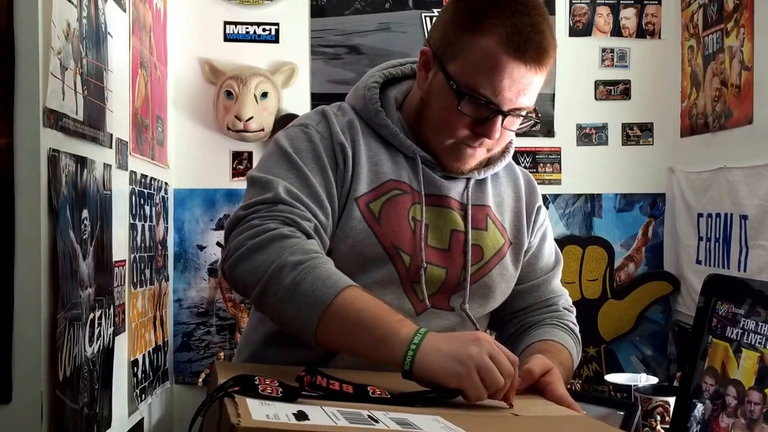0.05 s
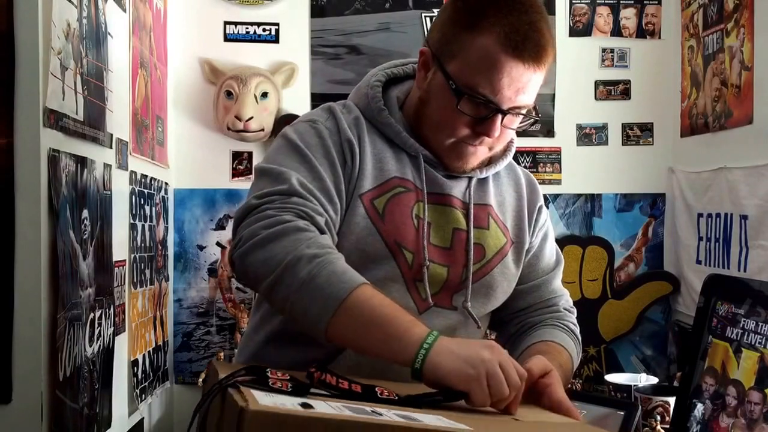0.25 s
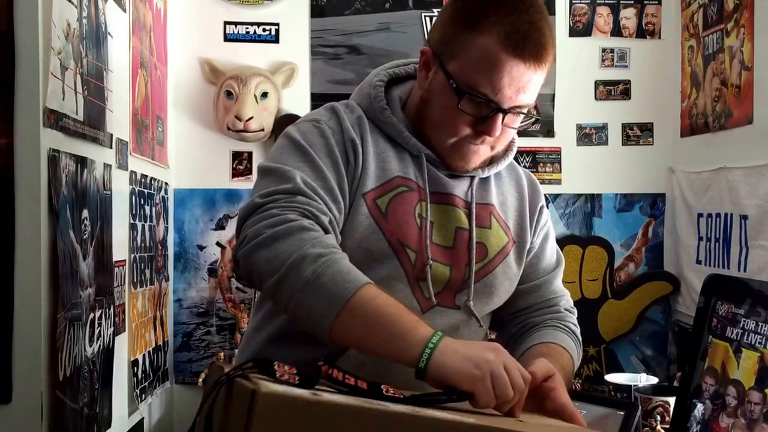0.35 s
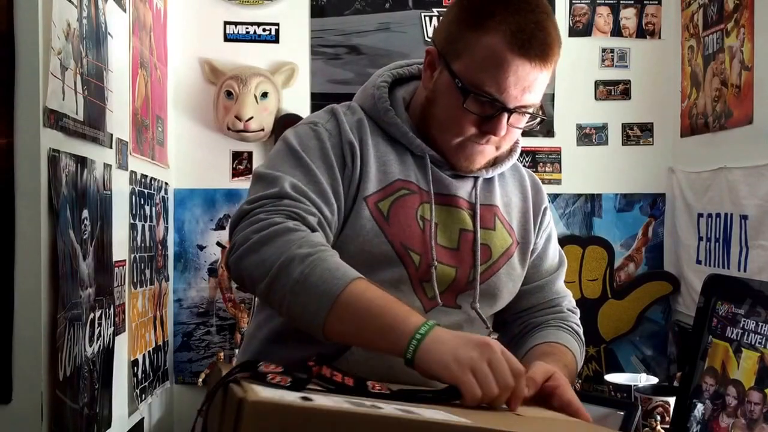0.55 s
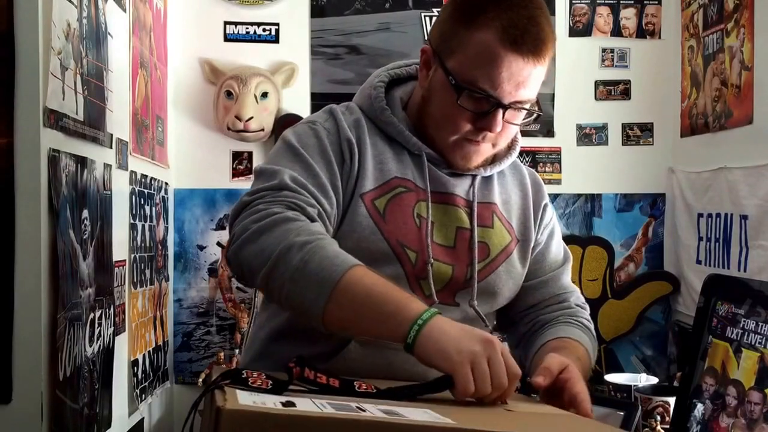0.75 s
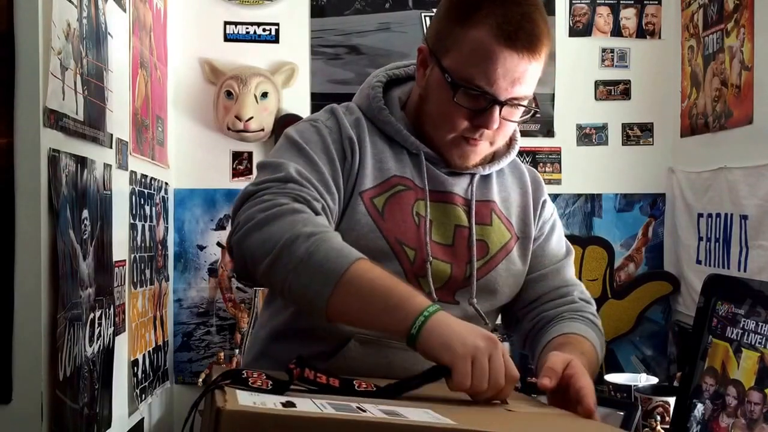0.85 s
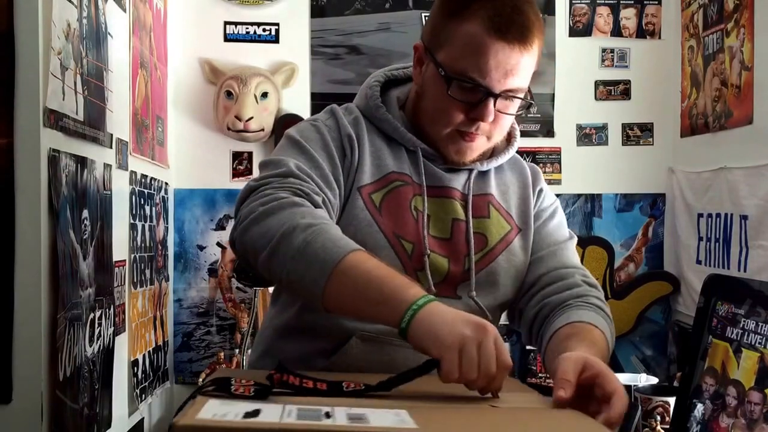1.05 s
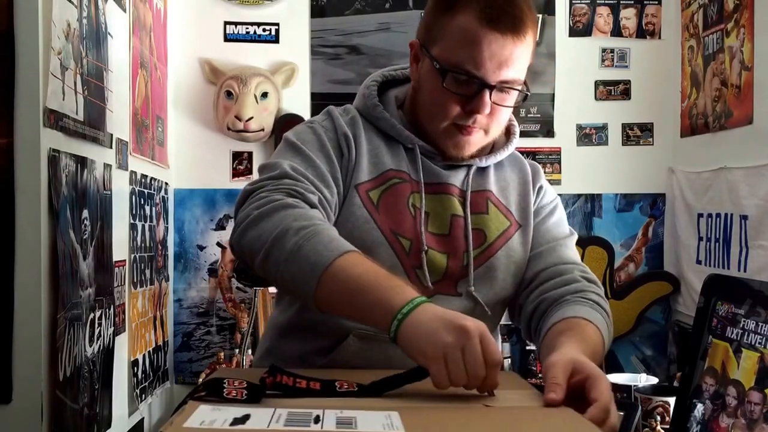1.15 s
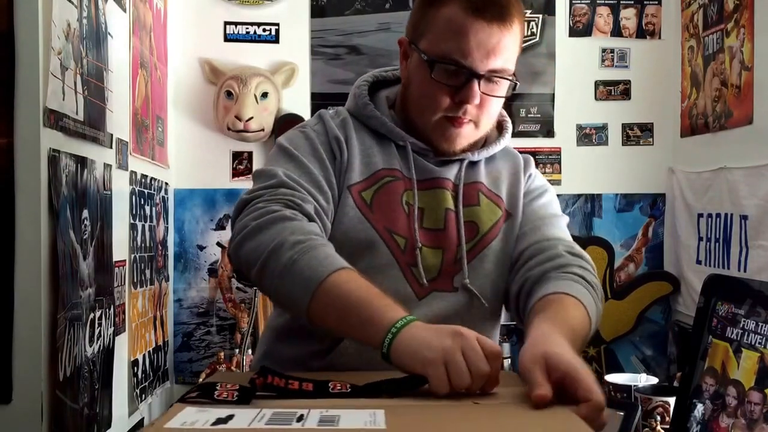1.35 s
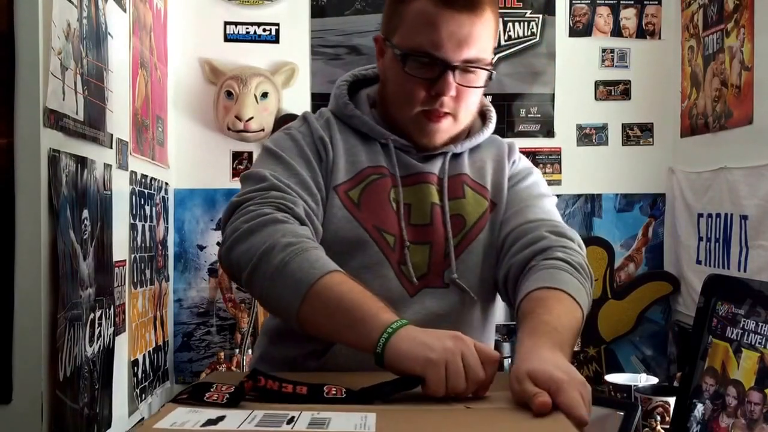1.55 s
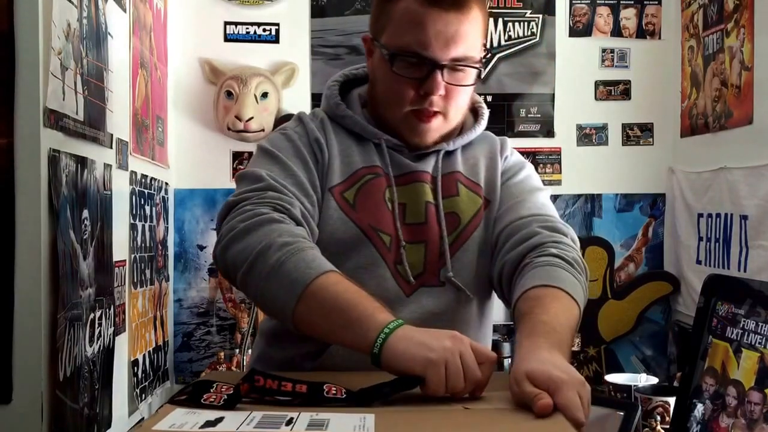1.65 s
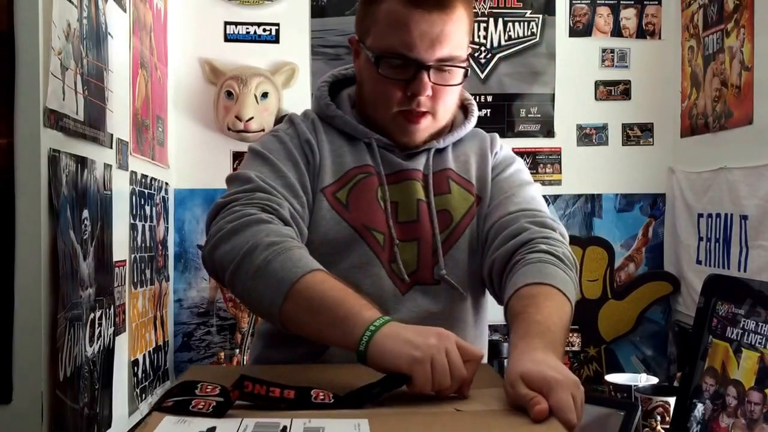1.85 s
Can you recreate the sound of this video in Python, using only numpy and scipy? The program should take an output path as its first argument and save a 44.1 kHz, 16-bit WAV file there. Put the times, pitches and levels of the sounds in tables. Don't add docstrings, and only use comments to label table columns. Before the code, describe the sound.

Fingers pick at tape on a cardboard box; a hollow slap and a sharp, bright crack come early, then faint tape ticks, light knocks and skin rubbing, close up in a small furnished room.

```python
import sys
import numpy as np
from scipy import signal
from scipy.fft import rfft, irfft, next_fast_len
from scipy.io import wavfile
from scipy.ndimage import map_coordinates

SR = 44100
rng = np.random.default_rng(int(sys.argv[2]) if len(sys.argv) > 2 else 0)


def undo_db(level):
    steps = np.asarray(level, float) / 20
    return 10 ** steps


def pcm_store(signal):
    levels = np.round(np.clip(np.atleast_2d(signal), -1, 1) * 32767)
    wavfile.write(sys.argv[1], SR, levels.astype(np.int16).T)


N = 83790

# f/Hz, level/dB per Hz
AIR_COLOUR = [(30, -14), (70, -0.5), (250, -2.5), (900, -7), (2300, -9.5), (6000, -16.5), (10000, -21),
              (15500, -24)]
AIR_DB = -67
# f/Hz, t60/s
ROOM_DECAY = [(100, 0.41), (300, 0.33), (1000, 0.33), (3000, 0.24), (7000, 0.19), (14000, 0.28)]
TAIL_DB, WALL_DELAY_S, WALL_DB = -4.5, 0.0071, -12

# t/s, level/dB
ROCKS = [(0.197, -29.5), (0.227, -18.5), (0.304, -33), (0.528, -46), (0.679, -43.5), (0.692, -47),
         (0.874, -53.5), (0.971, -53), (1.225, -50), (1.395, -37.5), (1.428, -38), (1.499, -38),
         (1.549, -49), (1.618, -40.5), (1.701, -43.5), (1.808, -38.5), (1.838, -49)]
# f/Hz, level/dB, t60/s
TABLE_MODES = [(40, -8, .06), (60, -3, .09), (95, 0, .08), (128, -8, .06)]
THUMP_RISE_S = 0.014

# t/s, length/s, level/dB, centre f/Hz, sharpness
STROKES = [(0.811, 0.13, -65.5, 10900, 0.39), (.91, 0.11, -65.5, 11000, 0.63),
           (0.921, 0.072, -68.5, 2220, 1.7), (1.1, 0.14, -67.5, 10950, 0.56),
           (1.247, .06, -68.5, 10000, 0.5), (1.243, 0.024, -73, 4200, 1.6),
           (1.347, 0.13, -69.5, 5000, 0.48), (1.4, 0.27, -69, 8500, 0.2), (1.439, 0.086, -61.5, 1960, 0.82),
           (1.47, 0.18, -66, 1495, 1.1), (.3, 0.18, -57.5, 567, 1.1), (0.162, 0.11, -53.5, 2780, 0.36),
           (0.4, 0.17, -71, 1200, 1.2), (.6, .11, -69, 900, .8), (0.973, 0.077, -70, 1010, 1.3)]
GRAIN_DB, GRAINS_PER_S = 1.8, 300

# t/s, level/dB, f/Hz, sharpness, crackle t60/s
TAPE_SNAPS = [(0.1945, -39.5, 5250, 0.17, 0.035), (0.198, -38, 7900, 0.21, 0.025),
              (0.205, -72, 9500, 1.2, 0.04), (0.2715, -9, 5090, 1.65, 0.0032),
              (0.271, -20.5, 3260, 0.09, 0.033), (0.2784, -12, 4000, 6.1, 0.0032),
              (0.5718, -53.5, 8300, 1.5, 0.011), (0.5726, -49, 1540, 3.2, 0.095),
              (.5712, -47.5, 4700, 8, .02), (0.577, -53, 4680, 8.4, 0.019), (0.5766, -54, 8150, 2, 0.023),
              (.606, -59, 5500, 5, .02), (.6177, -48.5, 8440, 8.8, 0.026), (.621, -59.5, 5030, 0.54, .04),
              (.629, -55, 4200, 3.9, 0.021), (.641, -62, 4440, 5, 0.05), (0.617, -47.5, 1470, 3.1, 0.11),
              (0.659, -65.5, 11900, 0.96, 0.064), (.664, -52, 4460, 11, 0.063),
              (0.673, -60, 6100, 3.6, 0.045), (.681, -59, 5300, 4.6, 0.018), (.756, -47, 9700, 13, 0.017),
              (0.755, -46.5, 5000, 1.8, 0.036), (0.76, -45, 4200, 1.7, .025),
              (0.7658, -56, 4300, 1.4, 0.033), (.763, -51, 14500, 10, 0.018),
              (1.089, -40.5, 3300, 2.1, 0.033), (1.088, -45, 2230, 4.2, 0.022),
              (1.097, -58.5, 6260, 0.33, 0.057), (1.122, -53, 5150, 0.51, 0.028),
              (1.585, -43, 6500, 1.15, 0.0054), (1.539, -57.5, 6770, 0.89, .02),
              (1.359, -60, 5000, 1.2, 0.031), (1.585, -60, 10050, 2.8, 0.039),
              (1.698, -71.5, 11000, 0.67, 0.056), (1.8015, -63, 12750, 1.2, 0.023),
              (1.804, -57, 4200, 0.26, 0.048),
              (1.882, -33, 1010, 5.7, 0.0195),
    (1.885, -56.5, 4070, 3.8, 0.058),
]
# f/Hz, sharpness, level/dB
STRIP_MODES = [(4700, 7, -12.5), (6500, 10, -7), (9200, 10, -5), (11140, 19, -2.5)]
PEEL_SHAPE, CLUMP_DB, CLUMPS_PER_S = 1.4, 3, 450

# t/s, level/dB, hardness f/Hz, tumble/s
LID_KNOCKS = [(.48, -50.5, 700, 0.061), (.62, -59, 1510, 0.015), (.57, -54.5, 880, 0.00442),
              (.605, -62, 600, 0.0061), (.67, -48, 570, 0.003), (.688, -82, 344, 0.0015),
              (.757, -54.5, 607, .004), (.915, -52, 420, 0.0203), (.955, -49, 487, 0.035),
              (1.0, -49.5, 586, .02), (1.04, -48, 528, 0.022), (1.219, -49, 610, 0.0022),
              (1.243, -53, 460, 0.0062), (1.31, -50, 342, 0.016), (1.335, -54, 340, 0.011),
              (1.384, -49, 405, 0.018), (1.44, -55, 676, 0.017), (1.51, -58, 904, 0.036),
              (1.585, -60.5, 1280, 0.013), (1.62, -54.5, 504, 0.012), (1.7, -72, 398, 0.0052),
              (1.803, -54.5, 613, 0.02074), (.08, -60.5, 417, 0.026)]
# f/Hz, level/dB, t60/s
LID_MODES = [(104, -13, 0.12), (150, -20.5, 0.17), (208, -0.5, 0.08), (290, -1, 0.083), (330, -1.5, 0.075),
             (378, 1.5, 0.053), (401, -7, 0.073)]
# f/Hz, level/dB
LID_CROWD = [(420, 32.5), (600, 35), (800, 37), (1150, 33), (1700, 44.5), (2050, 12), (2600, 16), (6500, 7)]

# t/s, level/dB, hardness f/Hz, tumble/s
EDGE_HITS = [(.76, -52.5, 1510, 0.008), (1.067, -49.5, 900, 0.0072), (1.084, -45, 1190, 0.0014),
             (1.0893, -36, 1190, 0.00056), (1.0928, -44.5, 910, 0.00043), (1.0958, -38, 880, 0.00071),
             (1.0988, -37.5, 2000, 0.00043), (1.11, -38.5, 1200, 0.0056), (1.123, -45.5, 1980, 0.0072),
             (1.143, -61, 900, 0.0022), (1.222, -63.5, 1235, 0.0108)]
# f/Hz, level/dB, t60/s
EDGE_MODES = [(210, -9, 0.041), (287, -8.5, 0.058), (387, -9.5, 0.03), (599, -5.5, 0.063), (815, -8, 0.11),
              (916, -11, 0.035), (1078, -12.5, 0.029), (1564, -6.5, 0.059), (2164, -3.5, 0.03)]
# f/Hz, level/dB
EDGE_CROWD = [(400, 19), (650, 32.5), (950, 35), (1400, 34.5), (2200, 28), (3500, 3), (5000, -3),
              (7000, -4)]

# t/s, level/dB, hardness f/Hz, tumble/s
SLAP_HITS = [
    (.1955, -34, 604, 0.0027),
    (.1985, -19.5, 650, .0025),
    (.229, -31.5, 550, 0.0005),
]
# t/s, level/dB, hardness f/Hz, tumble/s
CRACK_HITS = [
    (.2722, -23, 2600, 0.00053),
    (.2772, -31.5, 3000, 0.0006),
    (.2815, -33.5, 2000, 0.0017),
    (.291, -32, 1800, 0.0016),
]
# f/Hz, level/dB, t60/s
SLAP_MODES = [(97.7, -7, 0.063), (165, -14, 0.11), (204, -1.5, 0.1), (278.2, -10, 0.14), (333, -5, 0.12),
              (389, -7.5, 0.11), (420, -15, .05)]
# f/Hz, level/dB, t60/s
CRACK_MODES = [(100, -28, 0.077), (158, -24, 0.087), (208.5, -7.5, .12), (277, -1, 0.086), (334, -7, 0.19),
               (380.4, -6, 0.08), (420, -29.5, .05)]
# f/Hz, level/dB
FLAP_MODES = [(550, -7), (620, -10), (775, -8.5), (925, -12), (969, -12), (1080, -10.5), (1135, -4),
              (1265, -5.5), (1357, -6.5), (1425, -6), (1500, -6.5), (1690, -4), (1810, -14.5), (2500, -6.5)]
# f/Hz, level/dB
HARD_CROWD = [(480, 7.5), (600, 23), (1200, 35.5), (1750, 37), (2050, 23.5), (2600, 23.5), (6500, 14)]
FLAP_T60_S = 0.042
IN_STEP_HZ = 450
BOX_RISE_S, BOX_RADIATES_HZ = 0.00055, 134

MIC_LOW_HZ, MIC_TOP_HZ = 40, 15350


def unit(x):
    return x / np.sqrt(np.mean(x ** 2) + 1e-20)


def along(points, hz):
    f, v = np.transpose(points)
    return np.interp(np.log(hz + 1), np.log(f + 1), v)


def filtered(x, response):
    m = next_fast_len(len(x) + 8192)
    return irfft(rfft(x, m) * response(np.fft.rfftfreq(m, 1 / SR)), m)[:len(x)]


def peak(hz, q):
    return lambda f: 1j * f * hz / q / (hz * hz - f * f + 1j * f * hz / q)


def add(track, s, sound):
    part = track[round(s * SR):][:len(sound)]
    part += sound[:len(part)]


def grit(depth_db, rate, n):
    return undo_db(depth_db * map_coordinates(rng.standard_normal(n), [np.arange(n) * rate / SR]))


def ring(modes, scatter_db, in_step_hz=0):
    t = np.arange(SR // 4) / SR
    hz, db, t60 = np.transpose(modes)[:, :, None]
    db = db + scatter_db * rng.standard_normal(hz.shape)
    alternate = (-1) ** np.arange(len(hz))[:, None]
    sign = np.where(hz < in_step_hz, 1, alternate)
    return (sign * undo_db(db - 60 * t / t60) * np.sin(2 * np.pi * hz * t)).sum(0)


def click(spectrum):
    m = 4096
    closed = [(spectrum[0][0] / 2, -20), *spectrum, (spectrum[-1][0] * 2, -20)]
    cepstrum = irfft(np.log(undo_db(along(closed, np.fft.rfftfreq(m, 1 / SR)))))
    cepstrum[1:m // 2] *= 2
    cepstrum[m // 2:] = 0
    sound = irfft(np.exp(rfft(cepstrum)))[:m // 2]
    return np.pad(sound, (0, SR // 4 - m // 2))


def room_air():
    white = rng.standard_normal(N)
    return undo_db(AIR_DB) * unit(filtered(white, lambda f: undo_db(along(AIR_COLOUR, f))))


def room(near, to_walls):
    out, step = np.zeros(N), SR // 15
    add(out, WALL_DELAY_S, undo_db(WALL_DB) * near)
    for i in range(0, N, step):
        hz, t, z = signal.stft(rng.standard_normal(SR // 2), SR, nperseg=256)
        decay = undo_db(-60 * t / along(ROOM_DECAY, hz)[:, None])
        tail = signal.istft(z * decay, SR, nperseg=256)[1]
        tail = tail / np.linalg.norm(tail)
        add(out, i / SR + 0.003, undo_db(TAIL_DB) * signal.fftconvolve(to_walls[i:i + step], tail))
    return out


def table_thumps():
    out = np.zeros(N)
    for s, db in ROCKS:
        sound = ring(TABLE_MODES, scatter_db=0.5)
        rise = 1 - np.exp(-np.arange(len(sound)) / SR / THUMP_RISE_S)
        add(out, s, undo_db(db - 1.5) * sound * rise)
    return out


def rubbing():
    out = np.zeros(N)
    for s, length, db, hz, q in STROKES:
        n = round(length * SR)
        rough = rng.standard_normal(SR // 2) * grit(GRAIN_DB, GRAINS_PER_S, SR // 2)
        stroke = unit(filtered(rough, lambda f: peak(hz, q)(f) ** 2))
        add(out, s, undo_db(db + 2.0) * stroke[:n] * np.hanning(n) ** 0.61)
    return out


def tape():
    out, t = np.zeros((2, N)), np.arange(SR // 8) / SR
    for s, db, hz, q, t60 in TAPE_SNAPS:
        fade = undo_db(db + 8.5 - 60 * (t / t60) ** PEEL_SHAPE)
        uneven = undo_db(4 * rng.standard_normal(len(t)))
        spikes = rng.standard_normal(len(t)) * uneven * grit(CLUMP_DB, CLUMPS_PER_S, len(t))
        spikes *= fade * np.linalg.norm(fade) / np.linalg.norm(spikes * fade)

        def colour(f):
            broad = peak(hz, q)(f) * peak(hz, 0.7)(f) / (1 + 1j * f / (0.95 * hz)) ** 2
            return broad * (1 + sum(undo_db(g) * peak(c, w)(f) for c, w, g in STRIP_MODES))

        add(out[0], s, filtered(spikes, colour))
        blended = np.linalg.norm(fade) * (t == 0)
        add(out[1], s + t60 / 8, filtered(blended, colour))
    return out


def knocks(rows, modes, crowd_colour, scatter_db=3.5, in_step_hz=0):
    out = np.zeros((2, N))
    t = np.arange(SR // 4) / SR
    crowd = click(crowd_colour)
    for s, db, hard_hz, tumble in rows:
        blows = np.zeros(SR // 10)
        when, size = rng.random((2, 7))
        blows[(when * tumble * SR).astype(int)] = 0.75 * size
        blows[0] = 1

        def touch(f):
            radiated = 1j * f / (BOX_RADIATES_HZ + 1j * f)
            return (radiated / (1 + 1j * f / hard_hz)) ** 2

        body = ring(modes, scatter_db, in_step_hz) * (1 - np.exp(-t / BOX_RISE_S)) + crowd
        body = undo_db(db + 3.5) * filtered(body, touch)
        add(out[0], s, signal.fftconvolve(blows / np.linalg.norm(blows), body))
        add(out[1], s + tumble / 2, body)
    return out


def box():
    flaps = [(hz, db, FLAP_T60_S) for hz, db in FLAP_MODES]
    lid = knocks(LID_KNOCKS, LID_MODES, LID_CROWD)
    edge = knocks(EDGE_HITS, EDGE_MODES, EDGE_CROWD)
    slap = knocks(SLAP_HITS, SLAP_MODES + flaps, HARD_CROWD, scatter_db=1)
    crack = knocks(CRACK_HITS, CRACK_MODES + flaps, HARD_CROWD, scatter_db=3, in_step_hz=IN_STEP_HZ)
    return lid + edge + slap + crack


def scene():
    near, to_walls = box() + tape() + rubbing() + table_thumps()
    return (near + room(near, to_walls) + room_air())[None]


def top_cut(x):
    return signal.sosfilt(signal.butter(12, 15800, fs=SR, output="sos"), x)


def record(dry):
    def microphone(f):
        bass_cut = (1j * f / (MIC_LOW_HZ + 1j * f)) ** 2
        return bass_cut * np.where(f < MIC_TOP_HZ, 1, undo_db(-12.5))

    return top_cut(filtered(dry[0], microphone)[None])


dry = scene()
out = record(dry)
pcm_store(out)
```